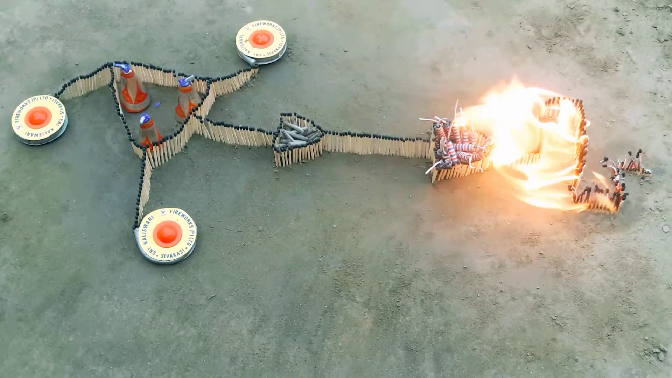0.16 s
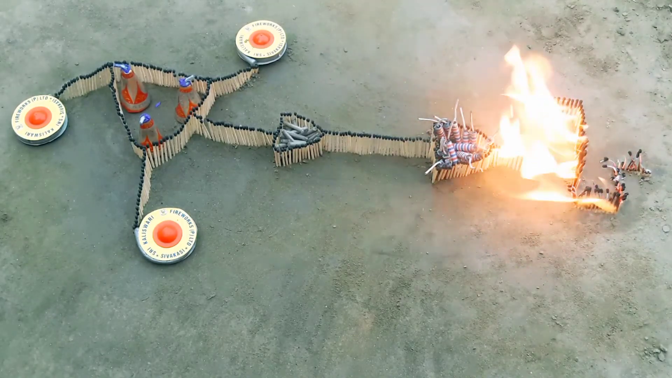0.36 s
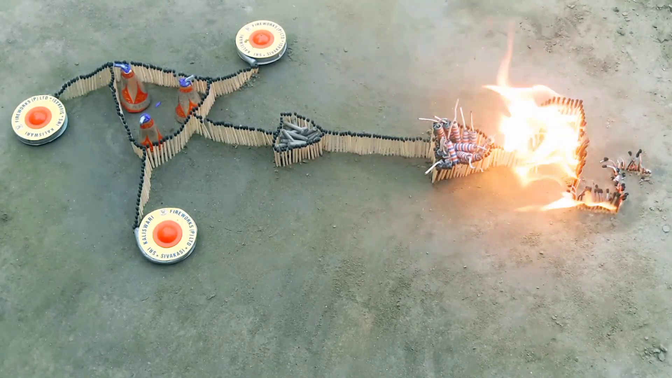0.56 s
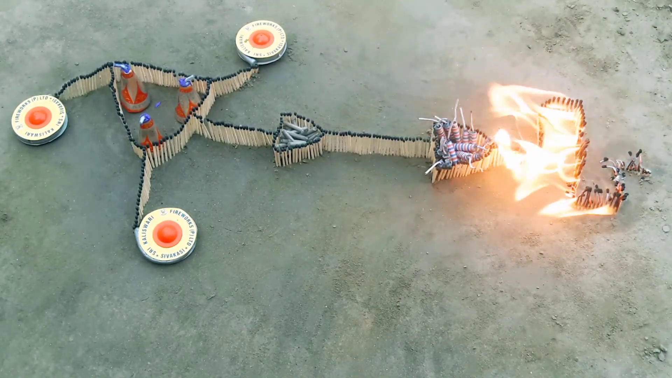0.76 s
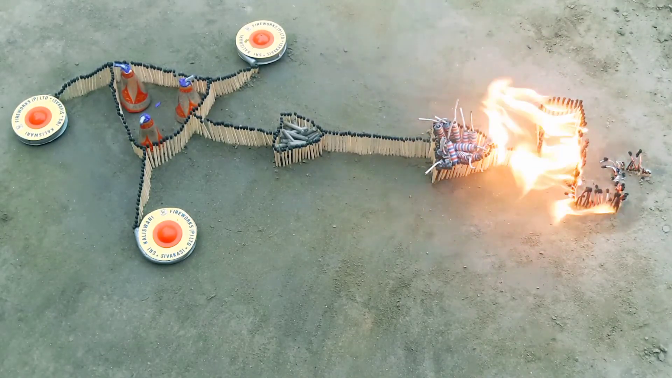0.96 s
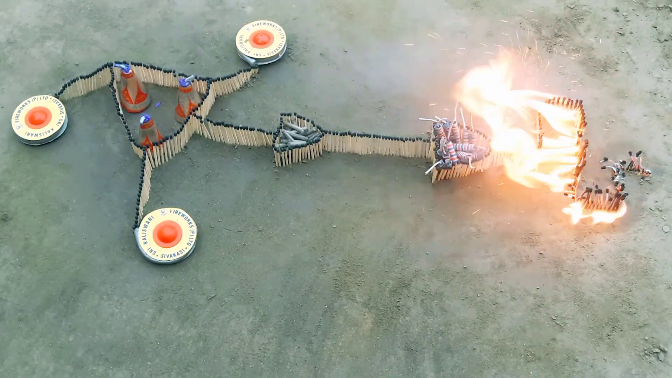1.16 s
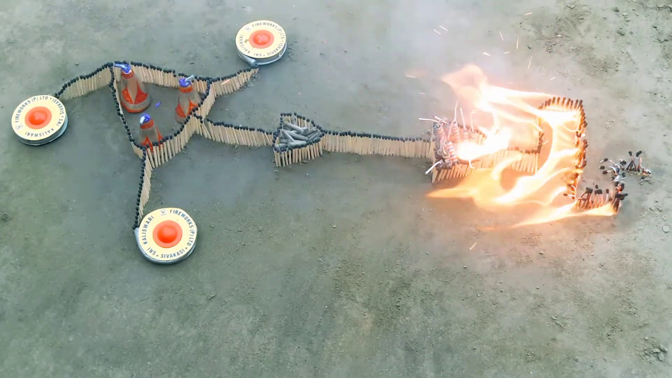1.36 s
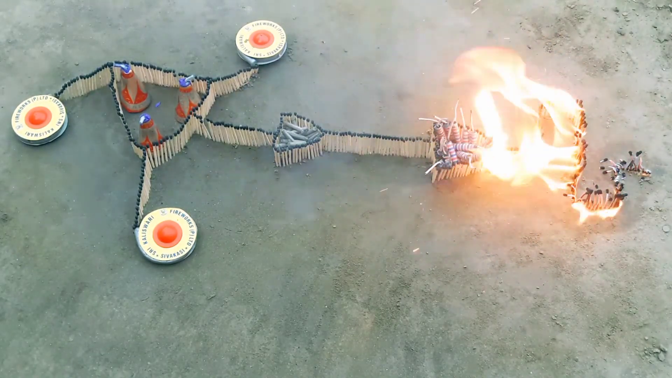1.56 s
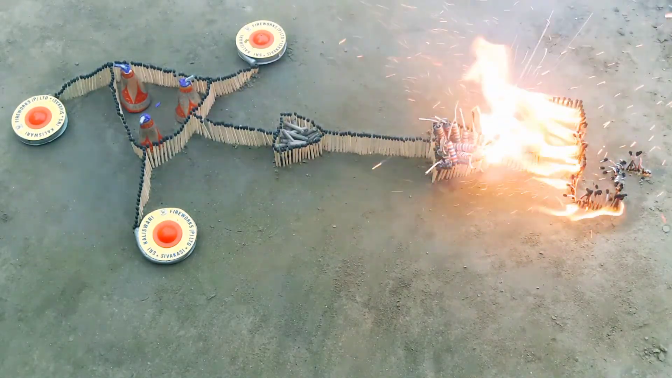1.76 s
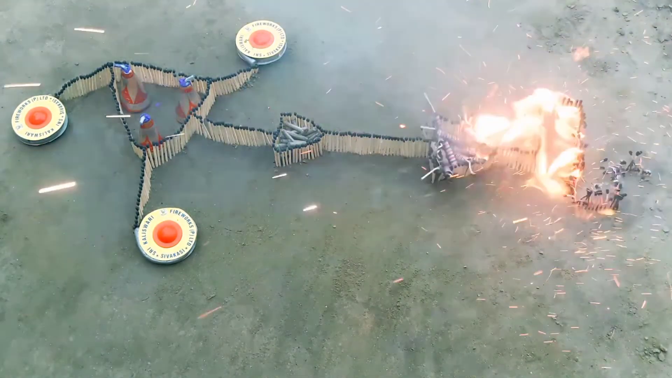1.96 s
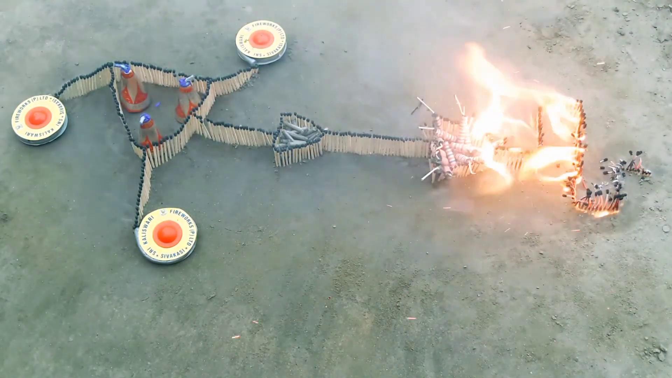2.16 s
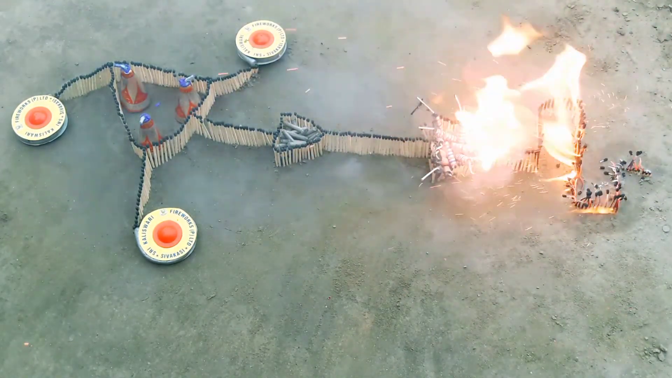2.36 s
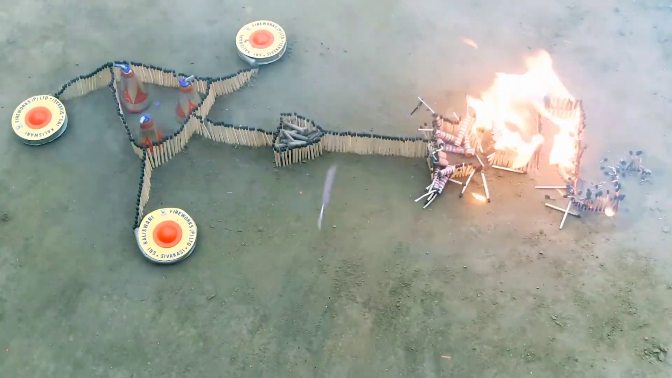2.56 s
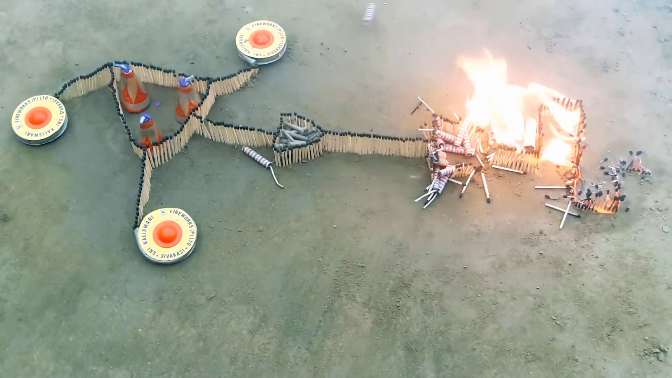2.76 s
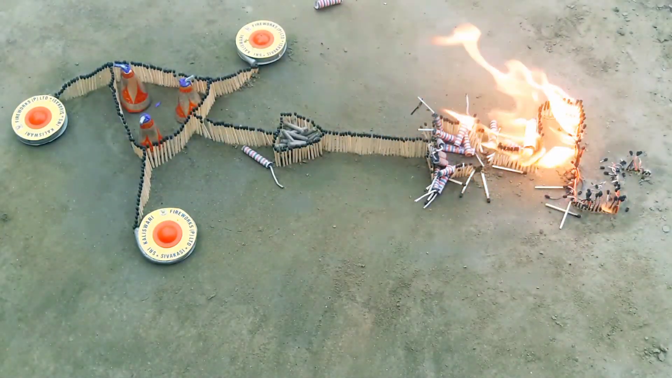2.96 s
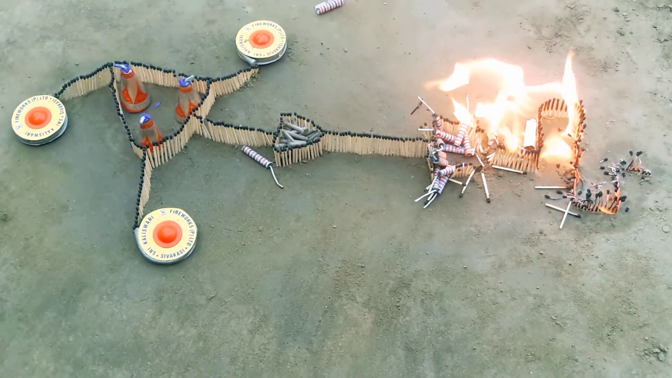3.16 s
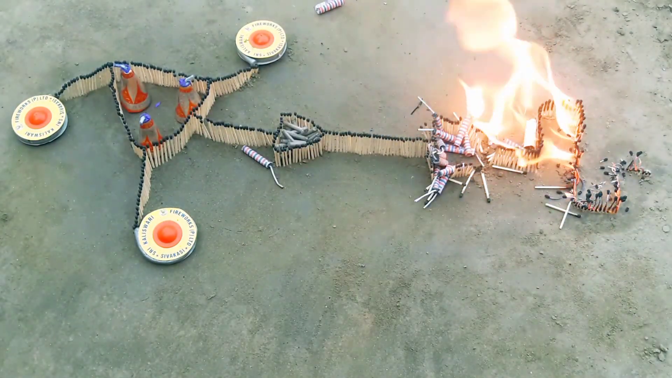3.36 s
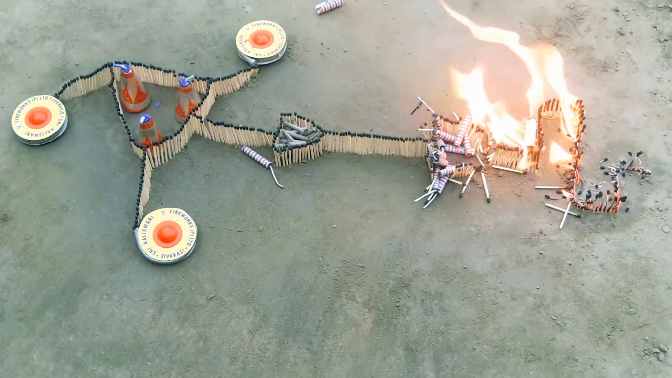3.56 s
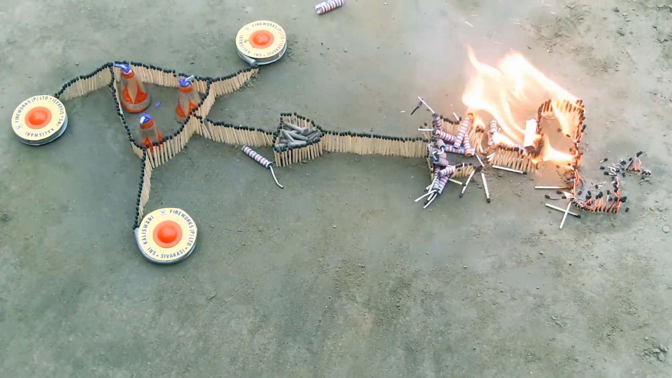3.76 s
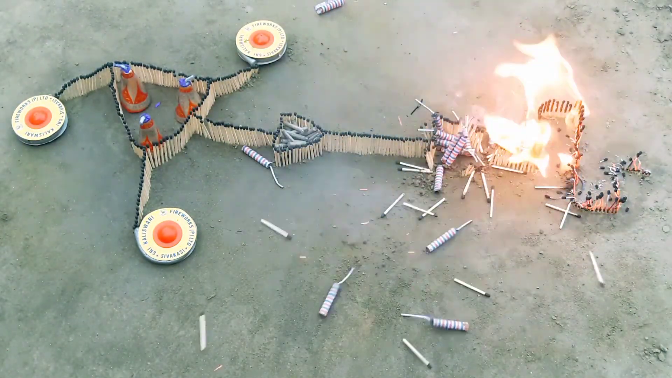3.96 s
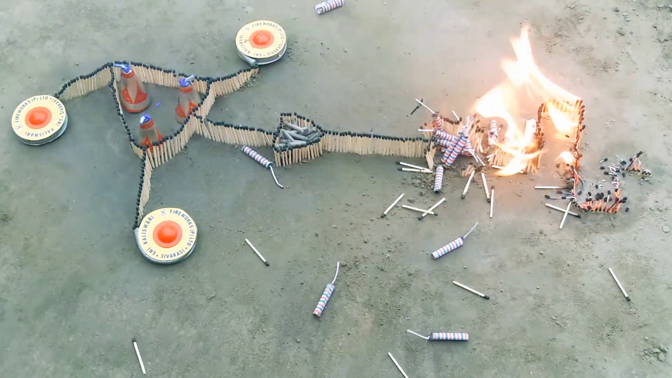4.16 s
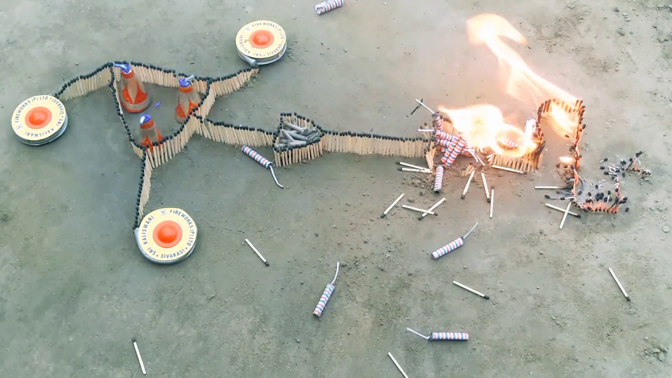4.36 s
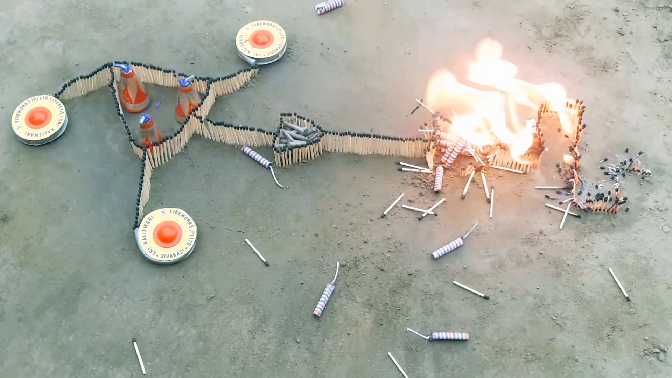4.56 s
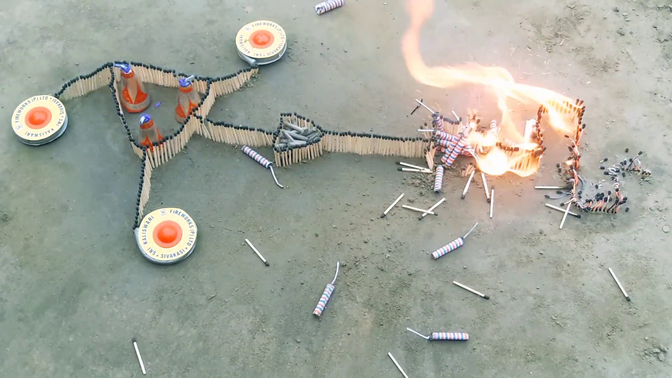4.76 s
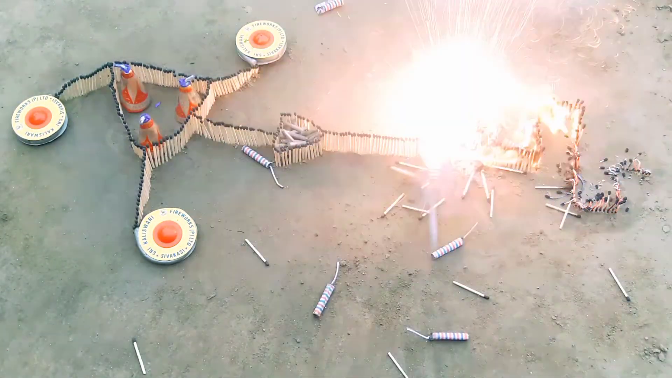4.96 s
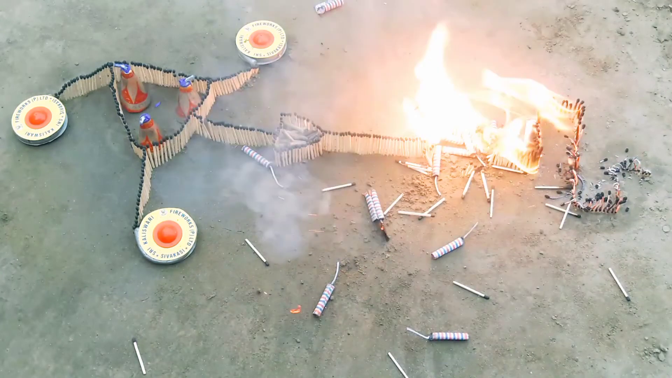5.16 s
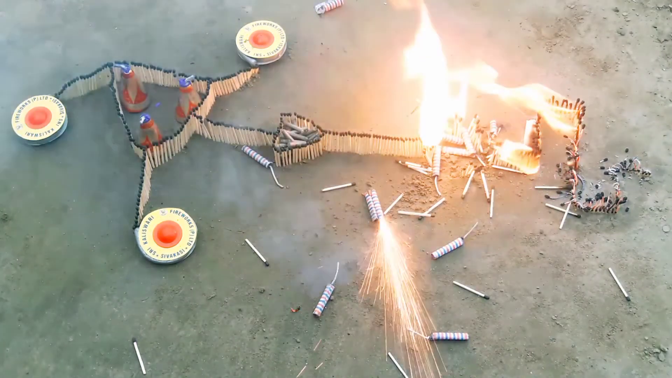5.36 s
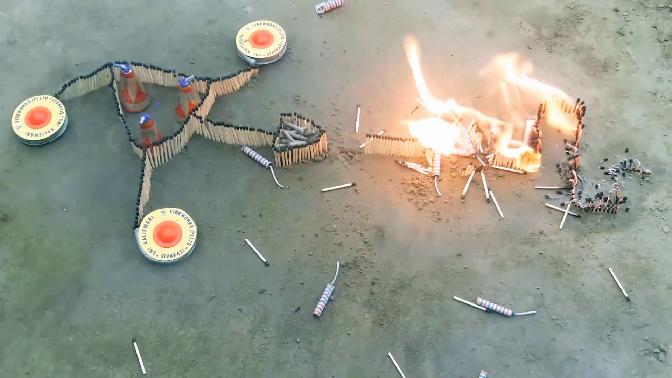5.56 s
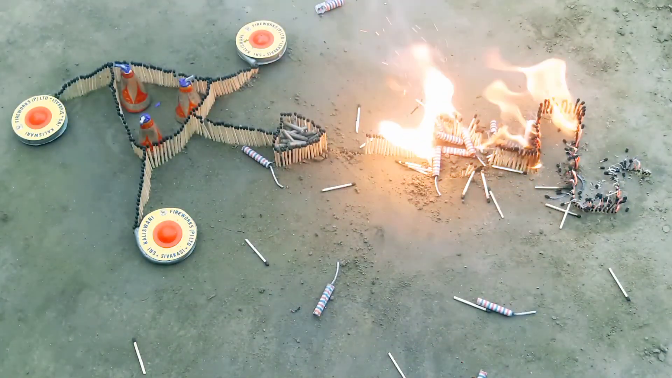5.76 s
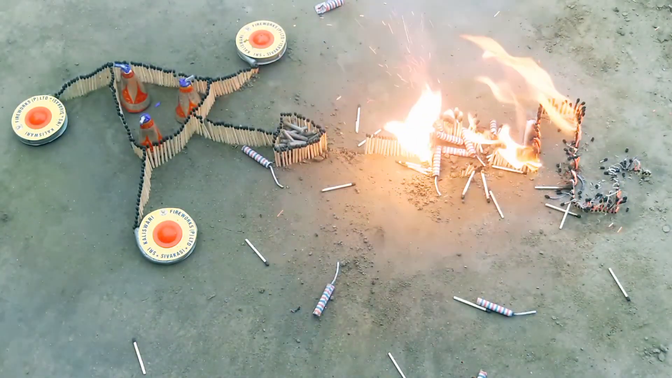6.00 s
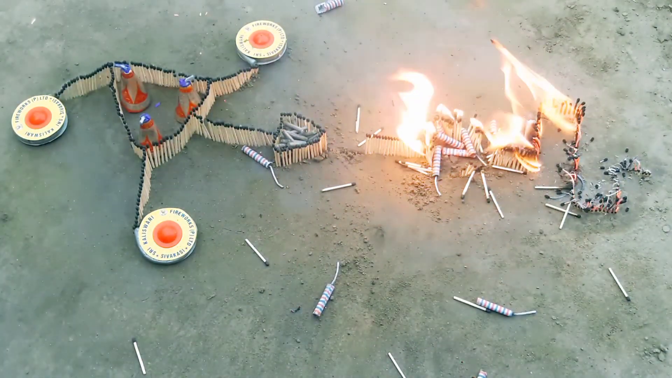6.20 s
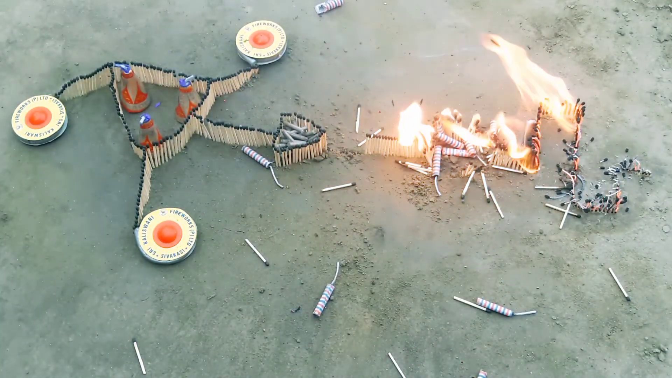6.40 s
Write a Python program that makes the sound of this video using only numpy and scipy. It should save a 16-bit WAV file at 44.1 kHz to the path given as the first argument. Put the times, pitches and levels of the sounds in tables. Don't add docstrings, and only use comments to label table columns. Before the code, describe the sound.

Seven small firecrackers crack and boom one by one from a hissing, fluttering match fire in a walled concrete yard, close up.

```python
import sys
import numpy as np
from scipy import signal
from scipy.fft import rfft, irfft
from scipy.io import wavfile
from scipy.ndimage import uniform_filter1d, minimum_filter1d, map_coordinates

SR = 44100
rng = np.random.default_rng(int(sys.argv[2]) if len(sys.argv) > 2 else 0)


def to_linear_factor(level_db):
    exponent = np.asarray(level_db, float) / 20
    return 10 ** exponent


def int16_out(signal):
    q = np.round(np.clip(np.atleast_2d(signal).T, -1, 1) * 32767)
    wavfile.write(sys.argv[1], SR, q.astype(np.int16))


N = 283690

# (time [s], crack [dB], boom [dB], charge size [1 = middling], thud [dB])
BURSTS = [
    (1.783, -29.5, -13.5, 0.83, -29),
    (2.018, -12.5, -0.5, 0.67, -31),
    (2.498, -14.5, -8, 0.96, -31),
    (3.938, -9, -9.5, 1.07, -12.5),
    (5.050, -4.5, -7.5, 0.92, -15.5),
    (5.482, -14.5, -19.5, 1.02, -28.5),
    (6.156, -11.5, -6, 0.92, -23.5),
]
# (delay [s], level [dB])
WALL_ECHOES = [(.0045, -7), (.0085, 3.5), (0.0199, -3.5), (0.0321, -4), (0.0409, -11.5), (.054, -13.5),
               (.065, -15)]
# (frequency [Hz], level [dB per Hz])
FIZZ_COLOUR = [(300, -25), (500, -4), (900, -2), (2000, -5), (3000, -7.5), (4500, -14), (6500, -17),
               (9000, -27.5), (13000, -54), (22000, -120)]
# (frequency [Hz], level [dB per Hz])
HISS_COLOUR = [(1500, -91), (4400, -46.5), (7500, -11), (10000, -7.5), (12700, 1), (14600, -1.5),
               (15400, -12), (15700, -57), (16000, -120)]


def unit(x):
    return x / np.sqrt(np.mean(x ** 2) + 1e-20)


def along(points, hz):
    f, v = np.transpose(points)
    return np.interp(np.log(hz + 1), np.log(f + 1), v)


def curves(rows, outside=None):
    s, *columns = np.transpose(rows)
    return [np.interp(np.arange(N) / SR, s, column, outside, outside) for column in columns]


def wobble(rate, size=N):
    knots = rng.standard_normal(int(size * rate / SR) + 4)
    return map_coordinates(knots, [np.arange(size) * rate / SR])


def patches(shape, wide, long):
    field = uniform_filter1d(rng.standard_normal(shape), size=wide, axis=0)
    return unit(uniform_filter1d(field, size=long, axis=1))


def noise(spectrum, patchy_db, size=N, tilt_db=0, wide=5, long=10):
    # comb spacing [Hz], first crest [Hz], level [dB], fades above [Hz]
    ground = (885, 230, -9.5, 15000)
    z = signal.stft(rng.standard_normal(size + 512), nperseg=512)[2]
    white = signal.istft(z * to_linear_factor(patchy_db * patches(z.shape, wide, long)), nperseg=512)[1][:size]
    hz = np.fft.rfftfreq(size, 1 / SR)
    spacing, crest, db, top = ground
    comb = 1 + to_linear_factor(db) / (1 + (hz / top) ** 4) * np.exp(-2j * np.pi * (hz - crest) / spacing)
    colour = to_linear_factor(along(spectrum, hz) + tilt_db * np.log2(hz / 1000 + .05))
    return unit(irfft(rfft(white) * comb * colour, size))


def causal(spectrum, size_factor, size=4096):
    hz = np.fft.rfftfreq(size, 1 / SR)
    cepstrum = irfft(np.log(to_linear_factor(along(spectrum, hz * size_factor)) + 1e-6))
    cepstrum[1:size // 2] *= 2
    cepstrum[size // 2 + 1:] = 0
    pulse = irfft(np.exp(rfft(cepstrum)))
    pulse = pulse / np.abs(pulse).max()
    return np.pad(pulse, (round(.0022 * SR), SR // 2))[:SR // 2]


def yard(length):
    # (frequency [Hz], t60 [s])
    decay = [(60, 0.076), (130, 0.3), (250, 0.25), (450, 0.28), (800, 0.17), (2500, 0.27), (5000, 0.32),
             (9000, 0.18), (15000, 0.055)]
    wall_s, clumps_db = 0.0098, 3
    hz, t, z = signal.stft(rng.standard_normal(SR // 2), SR, nperseg=256)
    z = z * to_linear_factor(clumps_db * patches(z.shape, wide=5, long=4))
    dying = to_linear_factor(-60 * t / length / along(decay, hz)[:, None])
    tail = signal.istft((hz < 15400)[:, None] * z * dying, SR, nperseg=256)[1][:SR // 2]
    t = np.arange(len(tail)) / SR
    tail = tail * to_linear_factor(0.59 * np.cos(2 * np.pi * t / wall_s)) * (1 - np.exp(-t / .004))
    tail /= np.linalg.norm(tail)
    for delay, db in WALL_ECHOES:
        late = (t - delay - rng.normal(0, .0003)) / .00022
        tail += to_linear_factor(db - 29.5 + rng.normal(0, 1.5)) * np.exp(-late ** 2)
    return tail


def bangs():
    # (frequency [Hz], level [dB per Hz])
    crack_colour = [(180, -22), (300, -5), (2640, -6), (7590, -19), (9920, -22), (12800, -15.5),
                    (15100, -23.5), (16400, -39.5)]
    # (frequency [Hz], level [dB per Hz])
    boom_colour = [(15, -70.5), (60, -19.5), (130, -9), (330, -3), (550, -3), (1000, -8.5), (2200, -13),
                   (4000, -23.5), (6000, -41), (12000, -54.5), (22000, -120)]
    # (frequency [Hz], level [dB], t60 [s])
    hollow = [(235, -1.5, 0.055), (395, -1, 0.075), (492, -4, 0.075)]
    slap_db, slap_loss_db_per_s = -15, 260
    out, t = np.zeros(N + SR), np.arange(SR // 2) / SR
    snap = causal(crack_colour, 1)
    split = np.clip(t / .001, 0, 1) * np.exp(-(t / .0038) ** 4)
    for s, crack_db, boom_db, charge, thud_db in BURSTS:
        crack = to_linear_factor(crack_db + 5.5) * split * noise(crack_colour, patchy_db=-0.43, size=len(t))
        slaps = sum(to_linear_factor(slap_db - slap_loss_db_per_s * delay) * np.roll(crack, round(delay * SR))
                    for delay, _ in WALL_ECHOES)
        boom = to_linear_factor(boom_db) * causal(boom_colour, charge)
        thud = sum(to_linear_factor(thud_db + db - 4.0 - 60 * t / t60) * np.sin(2 * np.pi * hz * t)
                   for hz, db, t60 in hollow)
        into_yard = to_linear_factor(9) * boom + to_linear_factor(crack_db + 3.0) * snap + thud
        echo = signal.fftconvolve(into_yard, yard(0.9))[:len(t)]
        bang = crack + slaps + to_linear_factor(5.0) * boom + to_linear_factor(-3.5) * thud + echo
        out[round((s - .0008) * SR):][:len(t)] += bang
    return signal.sosfilt(signal.butter(2, 75, "high", fs=SR, output="sos"), out[:N])


def jets():
    # (frequency [Hz], level [dB per Hz])
    jet_colour = [(120, -37.5), (200, -12), (750, 2.5), (2200, -7.5), (4400, -6.5), (9000, -13),
                  (14000, -10), (15400, -17.5), (15700, -64), (16000, -120)]
    # (time [s], level [dB], fall [s], burns for [s], tilt [dB per octave])
    after = [
        (1.783, -18, 0.088, .09, 0.9),
        (2.018, -9, 0.037, .35, 1),
        (2.499, -27, .04, .3, -3.5),
        (3.940, -13, 0.021, 0.16, 4),
        (5.051, -38, 0.051, 0.23, 2.2),
        (5.481, -18.5, 0.0062, .12, 4.6),
        (5.49, -43, 0.042, 0.12, 4.5),
        (6.156, -25, 0.038, .3, -2.3),
    ]
    # (until [s], level [dB], swell [s], tilt [dB per octave])
    leaks = [
        (1.783, -18.5, 0.0019, 1.15),
        (3.932, -35, .025, 0.2),
        (3.94, -13.5, 0.0015, -2),
        (5.481, -16, .0057, 0.6),
    ]
    out, lead = np.zeros(N + SR), SR // 8
    t = (np.arange(SR // 2) - lead) / SR
    answer = yard(0.97)
    rows = [(s, db, .0006, fall, burn, tilt_db) for s, db, fall, burn, tilt_db in after]
    rows += [(s, db, swell, .0015, 1, tilt_db) for s, db, swell, tilt_db in leaks]
    for s, db, rise, fall, burn, tilt_db in rows:
        swell = np.exp(np.minimum(t, 0) / rise - np.maximum(t, 0) / fall)
        swell = swell / (1 + np.exp((t - burn) / 0.009))
        jet = to_linear_factor(db) * swell * noise(jet_colour, patchy_db=-2.8, size=len(t), tilt_db=tilt_db)
        echo = to_linear_factor(-14.5) * signal.fftconvolve(jet, answer)[:len(t)]
        out[round(s * SR) - lead:][:len(t)] += jet + echo
    return out[:N]


def whistle(hz, partials, rough, flutter_db=5.0, flutter_hz=60):
    size = len(hz)
    phase = 2 * np.pi * np.cumsum(hz * (1 + rough * wobble(150, size=size))) / SR
    return sum(np.sqrt(2) * to_linear_factor(db + flutter_db * wobble(flutter_hz, size=size)) * np.sin(k * phase)
               for k, db in partials)


def squeal():
    # (time [s], pitch [Hz], level [dB], pinch of the mouth [dB per overtone])
    venting = [(1.565, 840, -51.5, -2), (1.59, 857, -47, -0.5), (1.625, 903, -48.5, 6),
               (1.66, 1005, -42, 1), (1.70, 1006, -62, 4), (1.712, 1033, -40.5, -0.5),
               (1.735, 1000, -39, -8.5), (1.76, 1056, -46, -17.5), (1.782, 1054, -46, -7)]
    overtones = [1.5, -5.5, -4.5, -12.5, -31]
    multiples, steps = (1, 2, 3, 4, 6), (0, 1, 2, 3, 3)
    hz, _, pinch_db = curves(venting)
    level_db = curves(venting, -200)[1]
    partials = [(k, level_db + db + n * pinch_db) for k, n, db in zip(multiples, steps, overtones)]
    return whistle(hz, partials, rough=.005, flutter_db=3)


def spits():
    # (time [s], peak [dB], treble [dB], length [s])
    puffs = [(0.234, -51, 4, 0.0052), (1.18, -48, -2, 0.0062), (1.227, -45, -20, 0.03),
             (1.268, -32, -12.5, 0.0076), (1.872, -21, -16, 0.0035), (3.713, -39, -30, 0.013),
             (3.821, -40.5, -13, 0.018), (4.835, -45.5, 0, 0.006), (4.879, -46.5, -1.5, 0.0085),
             (4.992, -50, -1, 0.0074), (5.944, -26.5, -5, 0.029)]
    out, t = np.zeros(N), np.arange(SR // 8) / SR
    for s, db, treble_db, length in puffs:
        hump = np.clip(t / .005, 0, 1) * np.exp(-(t / length / 2) ** 4)
        dull = noise(FIZZ_COLOUR, patchy_db=4.0, size=len(t))
        bright = noise(HISS_COLOUR, patchy_db=0, size=len(t), tilt_db=-10.0)
        puff = dull + to_linear_factor(treble_db + 3.0) * bright
        out[round((s - .002) * SR):][:len(t)] += to_linear_factor(db - 8.0) * hump * puff
    return out


def fire():
    # (frequency [Hz], level [dB per Hz])
    roar_colour = [(15, -38.5), (25, -20), (27, -33), (43, -29), (161, -2), (308, 1), (517, -10.5),
                   (738, 1), (1200, -31.5), (1560, -33), (2640, -120)]
    # (time [s], strength [dB])
    flames = [(0, -51), (.6, -53.5), (.9, -53.5), (1.28, -50), (1.6, -52.5), (1.95, -52), (2.35, -52),
              (2.8, -50.5), (3.05, -52.5), (3.4, -49.5), (3.8, -48), (4.2, -50), (4.6, -50.5), (5.0, -52.5),
              (5.3, -53), (5.9, -49.5), (6.14, -37.5), (6.43, -55)]
    # (alight [s], spent [s], level [dB])
    burning = [(0, .16, -56.5), (0.217, 0.257, -56.5), (0.323, .5, -58.5), (.42, .45, -61.5),
               (0.522, 0.73, -57.5), (0.103, 1.2, -63), (.96, 1.01, -58), (1.171, 1.774, -55.5),
               (1.626, 1.683, -50), (1.775, 1.978, -50.5), (2.25, 2.5, -57), (2.6, 2.998, -67.5),
               (3.29, 3.532, -71), (3.25, 3.63, -77), (3.705, 3.725, -63), (3.824, 3.85, -67),
               (3.87, 3.93, -59), (4.656, 4.8, -82), (4.842, 4.843, -62.5), (4.89, 4.908, -63),
               (4.983, 5.046, -62), (5.096, 5.495, -52.5), (5.55, 6.078, -53.5), (6.12, 6.15, -45),
               (6.246, 6.427, -59)]
    catch_db_per_s, die_db_per_s = 700.5, 329
    fizz_of_flame_db, fizz_of_fuse_db = -6.5, 5.5
    flame_db, = curves(flames)
    t = np.arange(N) / SR
    fuse_db = [db - catch_db_per_s * np.maximum(lit - t, 0) - die_db_per_s * np.maximum(t - spent, 0)
               for lit, spent, db in burning]
    fuses = to_linear_factor(np.max(fuse_db, axis=0))
    heads = np.hypot(to_linear_factor(flame_db + fizz_of_flame_db), to_linear_factor(fizz_of_fuse_db) * fuses)
    flicker = wobble(20)
    roar = to_linear_factor(flame_db + .4 * flicker + 1.2 * wobble(14)) * noise(roar_colour, patchy_db=.5)
    fizz = heads * to_linear_factor(1.0 * flicker + 0.53 * wobble(25)) * noise(FIZZ_COLOUR, patchy_db=1.0)
    spurts = to_linear_factor(1.1 * flicker + 1.5 * wobble(45))
    hiss = fuses * spurts * noise(HISS_COLOUR, patchy_db=.9, wide=24, long=4)
    return roar + fizz + hiss


def glides(rows, rough, flutter_db, flutter_hz):
    out = np.zeros(N)
    for start, end, from_hz, to_hz, db in rows:
        t = np.arange(start, end, 1 / SR)
        fade = np.clip(np.minimum(t - start, end - t) / 0.021, 0, 1)
        hz = np.linspace(from_hz, to_hz, len(t))
        line = whistle(hz, [(0.99, db)], rough, flutter_db, flutter_hz)
        out[round(start * SR):][:len(t)] += fade * line
    return out


def far_fuses():
    # (from [s], to [s], from [Hz], to [Hz], level [dB])
    whines = [(1.14, 1.24, 1700, 1710, -60), (3.38, 3.52, 1310, 1400, -56), (3.54, 3.61, 1324, 1410, -60),
              (3.64, 3.7, 1310, 1265, -57), (3.34, 3.52, 322, 306.6, -50.5), (3.25, 3.36, 623, 660, -58),
              (3.49, 3.63, 3700, 3640, -65), (3.73, 3.84, 708, 733, -54), (3.73, 3.87, 232.5, 269, -51),
              (4.32, 4.43, 1280, 1340, -63), (4.53, 4.78, 1393, 1543, -60.5),
              (4.66, 4.73, 1000, 1040, -58.5)]
    return glides(whines, rough=.004, flutter_db=2, flutter_hz=60)


def crickets():
    # (from [s], to [s], from [Hz], to [Hz], level [dB])
    songs = [(.75, 1.32, 7400, 7480, -72), (1.62, 1.99, 5420, 5450, -62.5), (1.71, 1.78, 6100, 6530, -55),
             (1.91, 2.0, 6460, 6500, -56), (2.6, 3.62, 5370, 5580, -75.5), (2.88, 3.6, 6160, 6400, -71),
             (3.08, 3.7, 7120, 7150, -76), (3.7, 3.9, 7740, 7640, -74.5), (4.22, 4.88, 7590, 7420, -78.5),
             (4.88, 5.04, 7800, 7340, -68), (4.65, 5.04, 6830, 6750, -79), (5.65, 6.1, 7300, 7460, -59.5)]
    return glides(songs, rough=.009, flutter_db=5, flutter_hz=300)


def far_air():
    # (frequency [Hz], level [dB per Hz])
    air_colour = [(15, -73.5), (25, -42), (266, -13.5), (332, -1), (446, -21), (585, -18), (4980, -44.5),
                  (6380, -39), (9000, -61.5), (11700, -87.5), (19800, -120)]
    return to_linear_factor(-72.5) * noise(air_colour, patchy_db=-3.14)


def gain_control():
    duck_db, sink_db, hold_s, recover_s = 12.5, 6, .58, 0.26
    since = np.arange(N) / SR - np.array(BURSTS)[1:, :1]
    depth_db = duck_db + sink_db * np.clip(since / hold_s, 0, 1)
    recovery = np.clip(1 - (since - hold_s) / recover_s, 0, 1)
    drop_db = (since > 0) * depth_db * recovery
    return to_linear_factor(-uniform_filter1d(drop_db.max(axis=0), size=400))


def duck():
    t = np.arange(N) / SR
    return to_linear_factor(-11 * sum(np.exp(-((t - row[0]) / .013) ** 4) for row in BURSTS[1:]))


def scene():
    ducked = gain_control() * (fire() + far_fuses() + crickets() + spits())
    background = ducked + far_air()
    return (bangs() + jets() + squeal() + duck() * background)[None]


def band_limit(x):
    return signal.sosfilt(signal.butter(12, 16650, fs=SR, output="sos"), x)


def record(dry):
    need = np.minimum(1, .9 / (np.abs(dry) + 1e-9))
    gain = uniform_filter1d(minimum_filter1d(need, size=90, axis=1), size=45, axis=1)
    return band_limit(dry * gain)


dry = scene()
out = record(dry)
int16_out(out)
```